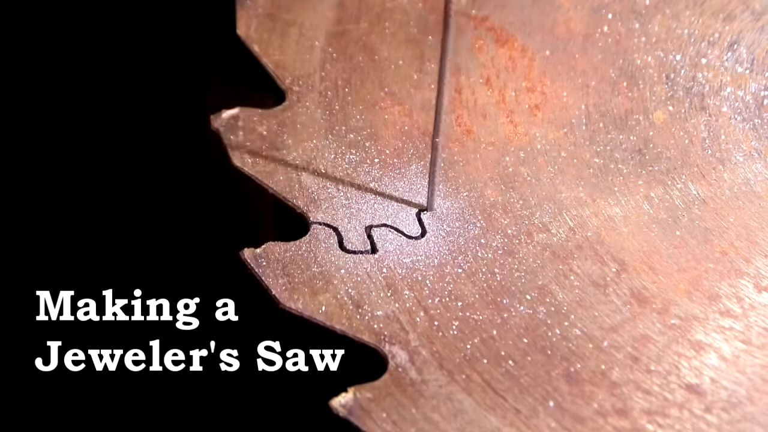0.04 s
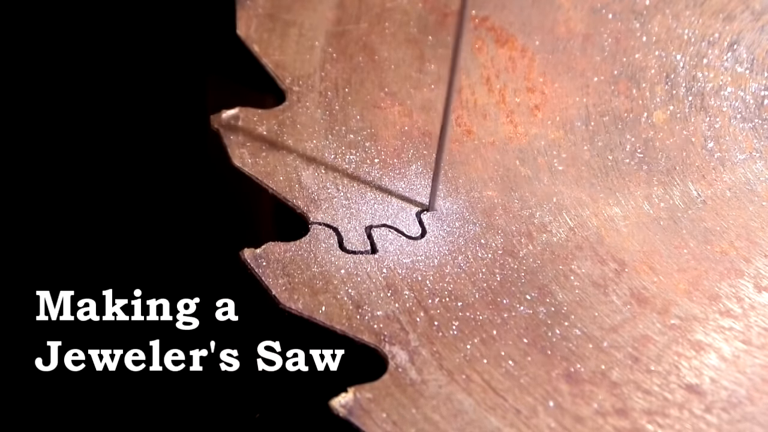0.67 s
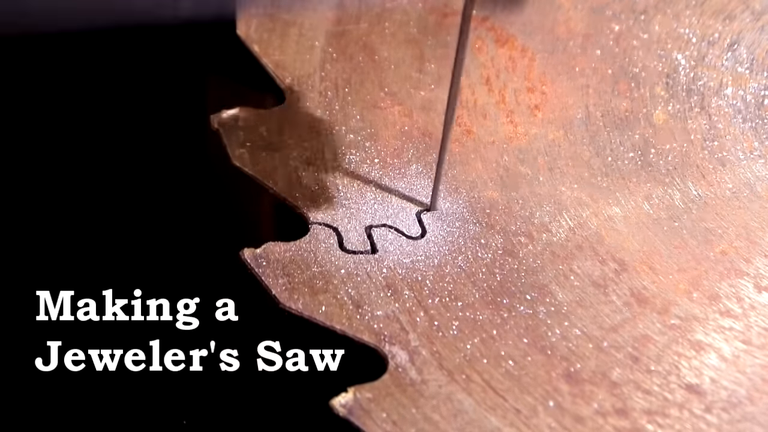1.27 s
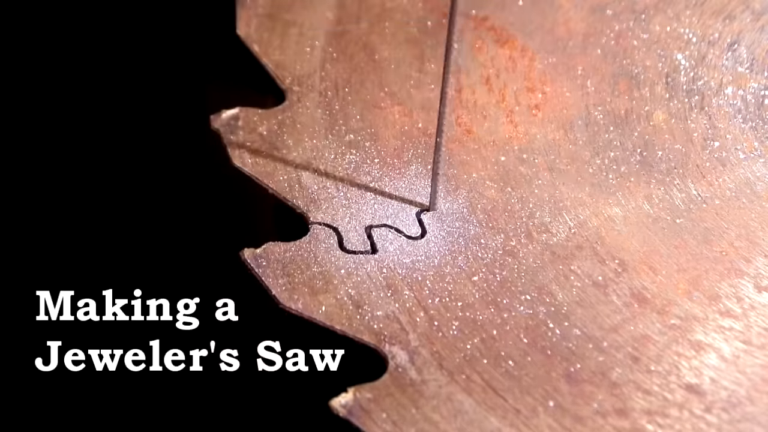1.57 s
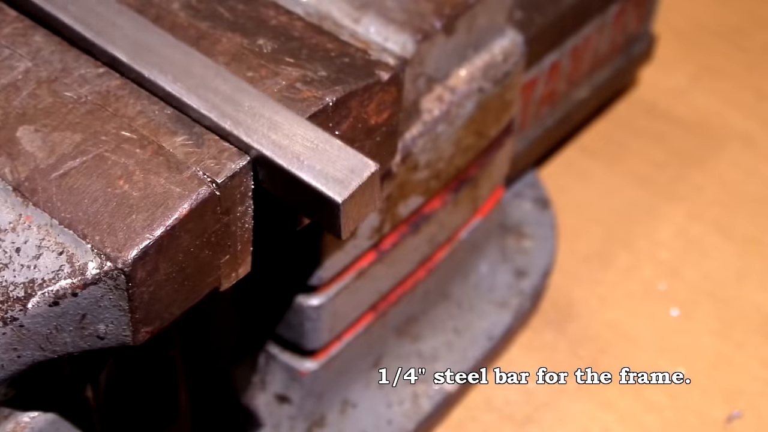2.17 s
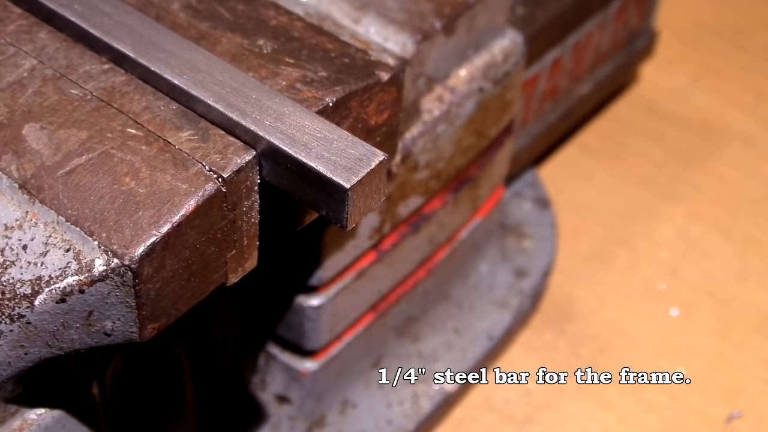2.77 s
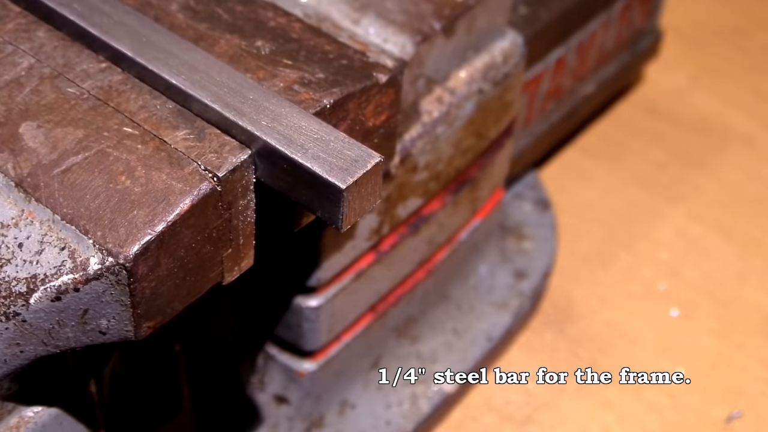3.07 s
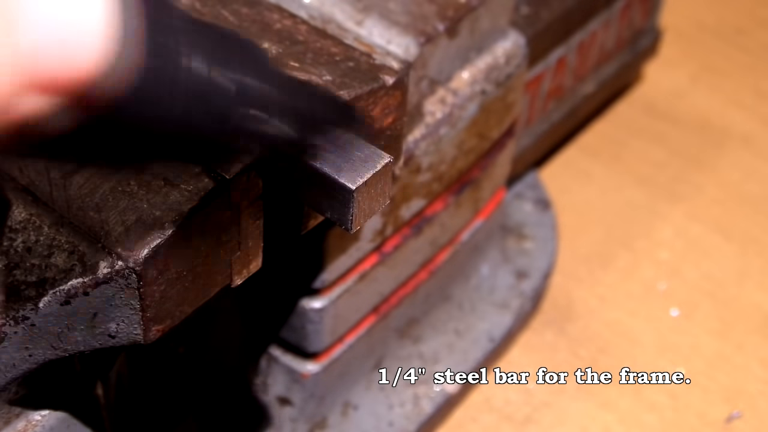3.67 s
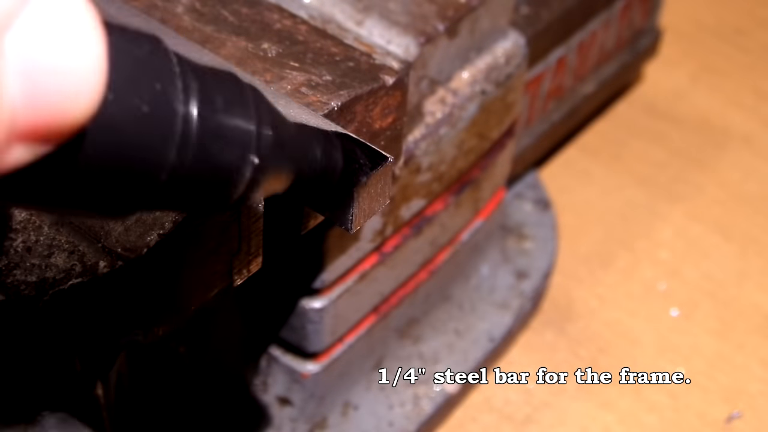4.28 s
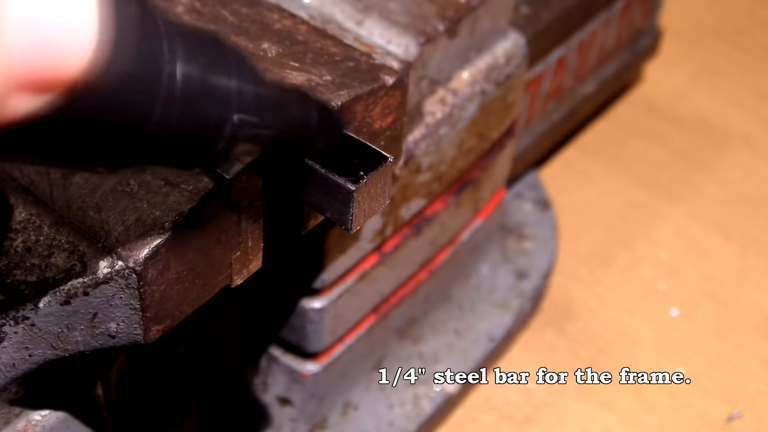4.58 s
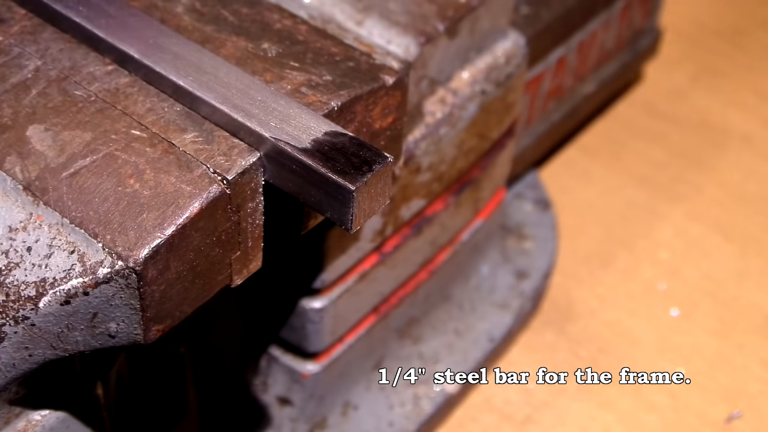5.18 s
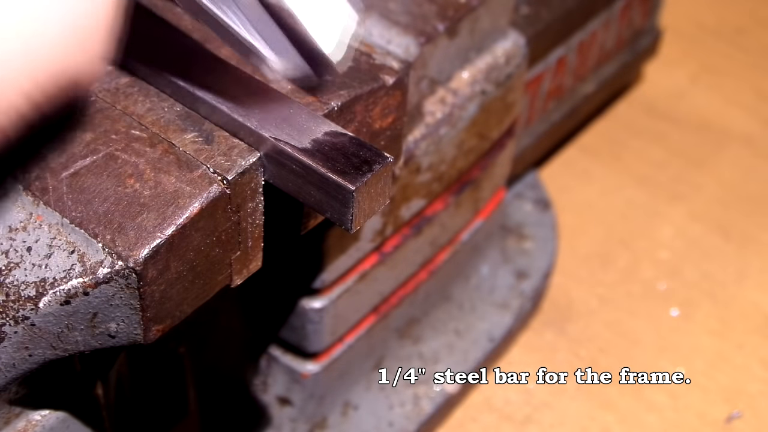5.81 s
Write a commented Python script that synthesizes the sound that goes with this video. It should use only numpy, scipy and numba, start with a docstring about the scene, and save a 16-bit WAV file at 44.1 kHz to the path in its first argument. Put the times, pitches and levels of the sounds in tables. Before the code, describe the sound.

A thin saw blade cuts a steel plate close to the microphone in a small, quiet workshop, rasping and singing with hard down-strokes and lighter returns. It stops abruptly and a steel clink follows. Hands bump softly about, and a marker's plastic cap clicks and rubs off. The felt tip hisses quietly over a steel bar in a few strokes and a quickening scribble, then faint swishes trail away.

```python
"""A thin fret-saw blade cuts a steel plate in a small, quiet workshop. The teeth tear chips on biting
down-strokes and lighter returns: the plate rasps, the bench rumbles, the taut blade sings and judders.
The sawing cuts off abruptly; a steel clink follows. Hands bump about and uncap a felt marker with
plastic clicks and a rub. Felt hisses over a steel bar held in a vice: four strokes, a quickening
scribble, one last stroke. Faint swishes follow as the hand withdraws."""
import sys
import numpy as np
from scipy import signal
from scipy.fft import rfft, irfft, next_fast_len
from scipy.io import wavfile
from scipy.ndimage import uniform_filter1d
from numba import njit

SR = 44100
rng = np.random.default_rng(int(sys.argv[2]) if len(sys.argv) > 2 else 0)


def wrap_up_sound(samples):
    """Save the sound to the file named by the first command line argument, as 16-bit audio."""
    columns = np.atleast_2d(samples).T
    # keep every value between -1 and 1, then stretch to whole-number steps
    tamed = np.clip(columns, -1, 1)
    steps = np.round(tamed * 32767).astype(np.int16)
    wavfile.write(sys.argv[1], SR, steps)


N = 266805
TIME = np.arange(N) / SR
CUTOFF_HZ = 15750
SAW_GATE_S = 1.851   # the sawing cuts off abruptly here

# bright hiss of the felt tip and the hand's swishes: (frequency [Hz], level [dB])
HISS_COLOUR = [(1180, -33), (2000, -10), (2420, -7), (3060, -0.5), (3740, -2), (4010, 1.5), (4770, -2),
               (5210, 1), (7000, 0.5), (10600, -3), (12300, 1.5), (15200, -4.5), (16000, -13)]


def from_db(db):
    """Decibels to gain."""
    return 10 ** (np.asarray(db) / 20)


def rms_one(x):
    """Scale to unit power."""
    return x / np.sqrt(np.mean(x ** 2) + 1e-20)


def evened(x, size=1300):
    """Ride the gain to hold unit power, smoothed over size samples."""
    return x / np.sqrt(np.abs(uniform_filter1d(uniform_filter1d(x * x, size), size)) + 1e-12)


def in_time(rows):
    """Breakpoints to one automation curve per column."""
    times, *columns = np.transpose(rows)
    return [np.interp(TIME, times, column) for column in columns]


def band(x, edges_hz, kind, order=4):
    """Butterworth filter."""
    return signal.sosfilt(signal.butter(order, edges_hz, kind, fs=SR, output="sos"), x)


def body(x, colour, modes=()):
    """Filter of unit power gain: a broad colour with resonances standing on it."""
    size = 2 * next_fast_len(N // 2 + SR // 4)
    hz = np.fft.rfftfreq(size, 1 / SR) + 1e-3
    colour_hz, colour_db = np.transpose(colour)
    power = from_db(np.interp(np.log(hz), np.log(colour_hz), colour_db)) ** 2
    for centre, width, db in modes:
        power = power + from_db(db) ** 2 / (1 + ((hz - centre) / width) ** 2) ** 2
    power /= np.mean(power * (hz < CUTOFF_HZ))
    cepstrum = irfft(np.log(power))[:size // 2]   # minimum phase: nothing sounds early
    cepstrum[0] /= 2
    return irfft(rfft(x, size) * np.exp(rfft(cepstrum, size)))[:N]


def ringing(x, t60, wet_db):
    """Countless close modes, of a plate or a small room, add a short diffuse tail."""
    t = TIME[:SR // 3]
    tail = rng.standard_normal(len(t)) * from_db(-60 * t / t60) * (t > .001)
    return x + from_db(wet_db) * signal.fftconvolve(x, tail / np.linalg.norm(tail))[:N]


@njit
def resonator(force, hz, width_hz):
    """One mode whose pitch can glide."""
    out, state = np.zeros(len(force)), 0j
    for i in range(len(force)):
        state = state * np.exp((-np.pi * width_hz + 2j * np.pi * hz[i]) / SR) + force[i]
        out[i] = state.real
    return out


def wander(rate_hz):
    """Smooth random modulation at unit power."""
    return rms_one(band(rng.standard_normal(N), rate_hz, "low", order=2))


def grit(per_s, spread_db):
    """Dense micro-clicks of uneven size, at unit power."""
    sizes = from_db(spread_db * np.minimum(rng.exponential(1, N), 4))
    return rms_one(rng.standard_normal(N) * sizes * (rng.random(N) < per_s / SR))


def pulses(per_s, jitter):
    """One click per cycle of an unsteady rate."""
    cycles = np.cumsum(per_s * (1 + jitter * wander(150))) / SR
    return np.diff(np.floor(cycles), prepend=0)


def blow(s, db, rise, t60):
    """Envelope that swells to its peak at s and dies away."""
    return from_db(db - 60 * np.maximum(TIME - s, 0) / t60) * np.exp(np.minimum(TIME - s, 0) / rise)


def swell(s, half, db=0):
    """Bell-shaped envelope around s."""
    return from_db(db) * np.exp(-((TIME - s) / half) ** 2)


def room_tone():
    """A steady, dark bed of workshop noise."""
    # (frequency [Hz], level [dB])
    room_colour = [(15, -61), (25, -18), (80, -13.5), (117, -1), (206, -9.5), (277, -8.5), (591, -12.5),
                   (714, -11), (911, -18), (1020, -16.5), (1440, -17), (1650, -18), (3920, -24),
                   (14800, -30.5), (16000, -33)]
    return from_db(-60) * body(rng.standard_normal(N), room_colour)


def rustle():
    """Faint swishes as the hand withdraws."""
    # (time [s], half length [s], level [dB])
    swishes = [(5.09, 0.077, -59), (5.384, 0.039, -65), (5.597, 0.025, -67.5)]
    return sum(swell(*swish) for swish in swishes) * body(rng.standard_normal(N), HISS_COLOUR)


def hands():
    """Each bump gives a low thud in the bench and a dull knock; lighter fumbling fills the gaps."""
    # soft bumps: (time [s], thud [dB], knock [dB])
    bumps = [(1.86, -41.5, -49.5), (1.904, -43.5, -42.5), (1.99, -50, -51.5), (2.174, -52, -48),
             (2.395, -45, -54), (2.459, -58, -51.5), (2.567, -55, -52), (2.684, -44.5, -49.5),
             (2.776, -56, -45.5), (2.875, -44.5, -65), (3.005, -62, -57), (3.111, -52, -61),
             (3.247, -39, -46)]
    # tone of each layer: (frequency [Hz], level [dB])
    thud_colour = [(40, 10), (90, -14), (120, 0), (175, 3), (220, -25), (400, -13), (1000, -55.5)]
    knock_colour = [(100, 10), (280, -5), (600, -0.5), (830, -0.5), (1100, -14), (2200, -14.5), (6000, -42)]
    fumble = from_db(-58 + 3.5 * wander(12)) * (TIME > 1.9) * (TIME < 3.2)
    thud_level = fumble + sum(blow(s, db, rise=.016, t60=.27) for s, db, _ in bumps)
    knock_level = sum(blow(s, db, rise=.002, t60=.14) for s, _, db in bumps)
    thuds = thud_level * evened(body(rng.standard_normal(N), thud_colour))
    knocks = body(knock_level * rng.standard_normal(N), knock_colour)
    return band(thuds + knocks, 89, "high")


def cap():
    """The marker's plastic cap clicks brightly, then rubs off its barrel with a duller rasp."""
    # clicks and slides: (time [s], level [dB], rise [s], t60 [s], low-pass [Hz])
    contacts = [(1.9603, -43.5, .0002, 0.067, 4500), (2.457, -56.5, .001, 0.054, 14000),
                (2.762, -41.5, .0002, 0.13, 14000), (2.7736, -23, 0.00025, 0.0096, 12700),
                (2.775, -54, .001, 0.069, 12000), (3.121, -42.5, 0.0013, 0.097, 4200),
                (3.132, -38.5, 0.002, 0.049, 4940), (3.228, -30.5, 0.0034, 0.091, 6000),
                (3.236, -35, 0.0029, 0.1, 5470)]
    # tone of the plastic: (frequency [Hz], level [dB])
    cap_colour = [(100, -32), (200, -5.5), (1300, -8), (2300, -3.5), (3300, -2), (4750, -6), (5400, -3),
                  (6300, -11), (8200, -3), (10000, -5), (11600, -10), (14000, -9), (16000, -24)]
    # its resonances: (frequency [Hz], width [Hz], level [dB])
    cap_modes = [(2290, 130, 6.5), (2830, 390, 3.5), (4080, 230, 1.5), (5700, 230, 5.5), (7000, 230, -2.5),
                 (8580, 60, 1), (8600, 80, -9)]
    force = 0
    for s, db, rise, t60, top_hz in contacts:
        contact = blow(s, db, rise, t60) * rng.standard_normal(N)
        force = force + band(contact, top_hz, "low", order=1)
    return body(force * from_db(1.8 * wander(600)), cap_colour, cap_modes)


def scribble_speed():
    """Relative speed of the tip as it swings to and fro, unevenly and ever faster."""
    start_s, end_s = 4.197, 4.909
    swings_per_s, quickening_per_s2 = 20, 11
    t = TIME - start_s
    swing = np.sin(np.pi * (swings_per_s * t + quickening_per_s2 * t ** 2 / 2)) ** 2
    turn = from_db(-10)   # some hiss remains at the turning points
    uneven = from_db(1.4 * wander(14))
    return (turn + (1 - turn) * swing) * uneven * (t > 0) * (TIME < end_s)


def marker():
    """Felt fibres slip over the steel bar; hiss and bar tone follow the speed of each stroke."""
    # single strokes: (fastest at [s], rise [s], fall [s], hiss [dB], bar [dB])
    lines = [(3.766, 0.046, 0.0091, -40, -41), (3.904, 0.056, 0.021, -44.5, -46.5),
             (4.007, 0.027, 0.044, -47.5, -53), (4.127, .04, 0.035, -48.5, -51),
             (4.943, 0.038, 0.018, -45.5, -70)]
    # pressure on the felt in the scribble: (time [s], hiss [dB], bar [dB])
    pressure = [(4.2, -47.5, -47), (4.27, -50.5, -66), (4.49, -47.5, -67), (4.63, -48.5, -57.5),
                (4.9, -46.5, -56.5)]
    # the tip lands on the bar: (time [s], level [dB], t60 [s])
    landings = [(4.207, -31, 0.0085), (4.728, -45.5, 0.043)]
    # tone of the clamped bar: (frequency [Hz], level [dB])
    bar_colour = [(30, -40), (80, 2), (150, -6), (500, -4.5), (900, -4.5), (1400, -3.5), (1800, 4.5),
                  (2300, -5.5), (4000, -0.5), (8000, -36)]
    strokes = [(swell(s, np.where(TIME < s, rise, fall)) ** 2, hiss_db, bar_db)
               for s, rise, fall, hiss_db, bar_db in lines]
    strokes.append((scribble_speed(), *in_time(pressure)))
    hiss_level = sum(from_db(db - 1.5) * speed for speed, db, _ in strokes)
    bar_level = sum(from_db(db - 1.6) * speed ** 2 for speed, _, db in strokes)
    taps = sum(blow(s, db, .00033, t60) for s, db, t60 in landings)
    felt = body((hiss_level + taps) * grit(per_s=20000, spread_db=3), HISS_COLOUR)
    bar = body((bar_level + .33 * taps) * grit(per_s=6000, spread_db=-.5), bar_colour)
    return felt + bar


def clink():
    """A short slide of steel on steel ends in a sharp contact."""
    # (time [s], level [dB], t60 [s])
    hits = [(1.883, -23, 0.074)]
    # tone of the steel: (frequency [Hz], level [dB])
    steel_colour = [(100, -21), (600, -11), (1100, -16), (2200, -17), (3000, -11), (7000, -9),
                    (11000, -14.5), (16000, -24)]
    # its resonances: (frequency [Hz], width [Hz], level [dB])
    steel_modes = [(498, 56, 4.5), (2760, 38, -3), (3000, 16, 5), (3710, 83, 3.5), (4120, 110, -0.5),
                   (4597, 50, -2), (6223, 60, -18), (6815, 68, -7), (8800, 130, -4), (10020, 60, -3),
                   (12590, 90, -6)]
    force = 0
    for s, db, t60 in hits:
        slide = blow(s, db - 13, .0045, t60)
        snap = blow(s, db, .0001, .007)
        tail = blow(s, db - 6, .0001, t60)
        force = force + slide + snap + tail
    return body(force * rng.standard_normal(N), steel_colour, steel_modes)


def bench(shake_db):
    """The sawing shakes a low rumble out of the bench."""
    # (frequency [Hz], level [dB])
    bench_colour = [(25, -42.5), (55, -8.5), (85, -25), (108, 3), (127, 12), (148, -9.5), (170, 6),
                    (195, -3), (240, -5.5), (290, 0.5), (380, -2.5), (540, -16), (600, -1.5), (680, -29),
                    (1000, -45.5)]
    return from_db(shake_db) * evened(body(grit(per_s=3000, spread_db=-.5), bench_colour))


def frame(force, shake_db):
    """The teeth ring one mode of the saw frame, just under the bench in level."""
    ring = resonator(force, hz=np.full(N, 582.), width_hz=34)
    return from_db(shake_db - 3) * evened(band(ring, [480, 680], "band", order=2))


def squeals():
    """The blade's flank rubs in the kerf and friction locks on to one high mode for a moment."""
    # (time [s], half length [s], pitch [Hz], level [dB])
    chirps = [(0.543, .026, 1870, -45), (0.956, 0.0056, 4654, -34), (1.168, 0.0071, 6180, -29)]
    return sum(np.sqrt(2) * swell(s, half, db) * np.sin(2 * np.pi * hz * TIME)
               for s, half, hz, db in chirps)


def judder(pitch):
    """Under heavy pressure the teeth snag once per swing of the blade: a snap and a spray of chips."""
    # (time [s], half length [s], level [dB])
    bursts = [(0.706, 0.011, -34.5), (1.199, 0.015, -22.5), (1.738, 0.024, -31.5)]
    # bright snap: (frequency [Hz], level [dB])
    snap_colour = [(400, -7.5), (3000, -2.5), (7000, 1), (9000, -5.5), (12000, -1.5), (16000, -14)]
    snags = pulses(pitch, jitter=.012)
    chips = evened(signal.lfilter([1], [1, -.96], snags) * rng.standard_normal(N))
    pressure = sum(swell(*burst) for burst in bursts)
    force = pressure * (1.2 * evened(snags) + .667 * chips)
    return ringing(body(force, snap_colour), t60=.061, wet_db=-5)


def tooth_tone(rate):
    """The tooth rate itself is heard as a gliding zip, with its octave."""
    phase = 2 * np.pi * np.cumsum(np.abs(rate) * (1 + .01 * wander(120))) / SR
    return (np.sin(phase) + from_db(-12.5) * np.sin(2 * phase)) * from_db(2 * wander(80))


def blade(force, pitch, swing_db):
    """The taut blade is half bowed, half shaken by the teeth: its fundamental and its octave."""
    phase = 2 * np.pi * np.cumsum(pitch * (1 + .016 * wander(78))) / SR
    bowed = np.sin(phase) * from_db(4.5 * wander(47.7))
    shaken = band(resonator(force, pitch, width_hz=9.2), [300, 700], "band", order=2)
    fundamental = evened(bowed + from_db(-3) * evened(shaken, size=900), size=900)
    bowed = np.sin(2 * phase) * from_db(.64 * wander(38.68))
    shaken = band(resonator(force, 2 * pitch, width_hz=27.48), [650, 1200], "band", order=2)
    octave = evened(bowed + from_db(-5.5) * evened(shaken))
    octave_db = -12.5 + .25 * (swing_db + 19)   # a wider swing is brighter
    return from_db(swing_db) * (fundamental + from_db(octave_db) * octave)


def scraping(force, cutting, rasp_db, plate_db):
    """High rasp and midrange plate ring; the blade presses on the kerf differently in each direction."""
    # broad tone of the scrape: (frequency [Hz], level [dB])
    cut_colour = [(100, -24.5), (700, -42), (1050, -14), (2000, -20), (2800, -17.5), (3400, -14),
                  (3800, -21), (5000, -22.5), (7900, -25), (8600, -33), (10500, -31), (12300, -27.5),
                  (14000, -31), (16000, -38.5)]
    return_colour = [(100, -21), (700, -53), (1050, -21), (2000, -22), (2800, -21.5), (3400, -17.5),
                     (3900, -23), (5000, -22.5), (7900, -24.5), (8600, -31.5), (10500, -28), (12300, -24.5),
                     (14000, -29.5), (16000, -35)]
    # resonances of plate and saw frame: (frequency [Hz], width [Hz], level [dB])
    cut_modes = [(818, 71, -9.5), (942, 39, -25.5), (1485.6, 22, -1.5), (1830, 72, -17.5), (2102, 13, -9),
                 (2610, 40, -18), (3070, 68, -6), (3310, 69, -9), (3450, 24.5, -8), (4445, 97, -20.5),
                 (4717, 120, -13), (5145, 88, -15), (6066, 46, -24), (6760, 100, -14), (7160, 32, -32),
                 (8020, 110, -27)]
    return_modes = [(806, 41.4, -3), (1203, 21, -5.5), (1427, 40, -5), (1800, 15, -10.5), (2660, 72, -26),
                    (3000, 46, -16.5), (3220, 39, -5.5), (3700, 42, -13.5), (4630, 230, -13),
                    (4980, 49, -20), (5285, 62, -14), (6064, 45, -18.5), (6700, 130, -14), (7740, 360, -19)]
    scrape = cutting * body(force, cut_colour, cut_modes)
    scrape += (1 - cutting) * body(force, return_colour, return_modes)
    treble = ringing(band(scrape, 2200, "high"), t60=.07, wet_db=-1)
    rasp = from_db(rasp_db + .74 * wander(90)) * evened(treble, size=600)
    plate = from_db(plate_db - 2.5) * evened(band(scrape, [680, 2200], "band"), size=700)
    return rasp + plate


def stroke_place(t, start, fastest, end):
    """0 at the fastest moment of a stroke, 1 at both turning points."""
    return np.interp(t, [start, fastest, end], [1, 0, 1])


def stroke_speed(t, start, fastest, end):
    """Speed of the sawing hand, 0-1, in a rounded arch."""
    return 1 - stroke_place(t, start, fastest, end) ** np.where(t < fastest, 1.55, 1.5)


def stroke_fade(t, start, fastest, end, entry, depth_db, curvature):
    """Level in dB relative to mid-stroke; a hard entry starts almost at full force."""
    return -depth_db * np.where(t < fastest, entry, 1) * stroke_place(t, start, fastest, end) ** curvature


def saw_motion():
    """Automation: tooth rate, blade pitch, and dB levels of rasp, plate, tooth tone, blade and bench."""
    # (start [s], fastest [s], end [s], top rate [teeth/s, negative on returns], soft entry [0-1],
    #  rasp [dB], plate [dB], tooth tone [dB], blade [dB], bench [dB], blade at full speed [Hz],
    #  swing stalls at [s], stall half length [s])
    strokes = [(-.25, -0.089, .055, -1500, 1, -32.5, -29, -44.5, -16.5, -35.5, 425.5, .06, 0.005),
               (.064, .165, .298, 1560, .8, -24, -22.5, -21.5, -17, -26, 422.8, .148, 0.0056),
               (0.301, 0.449, 0.56, -1700, 0.72, -27, -29, -45, -18, -33.5, 420.2, .437, 0.034),
               (0.584, 0.707, 0.87, 1495, 0.19, -25.5, -24, -15, -16, -23.5, 484.3, 0.68, 0.019),
               (.85, .965, 1.121, -1600, 0.71, -30.5, -30.5, -55, -20.5, -29, 406.2, .975, 0.011),
               (1.123, 1.207, 1.381, 1749.5, 0.66, -23.5, -23, -26.5, -14, -25.5, 428.3, 1.268, 0.0099),
               (1.386, 1.51, 1.623, -1600, 0.88, -33, -32.5, -51, -22.5, -34, 410.3, 1.527, 0.011),
               (1.657, 1.746, 1.86, 1801, 0.88, -21.5, -22.5, -27.5, -14.5, -23.5, 425.7, 1.755, 0.0094)]
    # fades towards the turning points, cut then return: (depth [dB], curvature)
    rasp_fade = ((29, 1.6), (29, 1.89))
    plate_fade = ((27.84, 1.6), (24.8, 2.77))
    blade_fade = ((33.5, 1.7), (24.8, 1.69))
    bench_fade = ((9, 2.2), (6, 0.83))
    # slow teeth shake the bench most: (rate [teeth/s], level [dB])
    bench_response = [(0, -11.5), (380, -1), (1000, -2), (1500, -8)]
    blade_lag_s, bench_trend_db_per_s = (.014, .022), (-9, 21)   # cut, return
    taut_hz, plate_mode_hz, lock_width_hz = 473.8, 1506, 95
    even_bite_s, even_fade_s, turn_s = .125, .035, .0019
    controls = np.zeros((7, N))
    for start, fastest, end, top_rate, entry, *levels, hz, stall, stall_half in strokes:
        rasp_db, plate_db, tone_db, blade_db, bench_db = levels
        now = (TIME >= start) & (TIME < SAW_GATE_S + .1)
        t, span = TIME[now], (start, fastest, end)
        way = int(top_rate < 0)   # 0 cut, 1 return
        rate = top_rate * stroke_speed(t, *span)
        late = t - blade_lag_s[way]   # the swing builds and dies later than the force
        if way:   # the pitch sags; after the stall it restarts sharp and slides flat
            restart = stall + .04
            pitch = hz - 90 * (t - fastest) - 750 * (t - restart) * swell(restart, .045)[now]
        else:   # a cut holds the blade taut until it nears full speed
            slack = np.clip(.5 + (stroke_speed(late, *span) - .86) / .1, 0, 1)
            pitch = taut_hz + (hz - taut_hz) * slack
        # the tooth tone peaks while the early, even bite meets the plate's main resonance
        even = np.exp(-np.maximum(t - start - even_bite_s, 0) / even_fade_s)
        lock = even / (1 + ((np.abs(rate) - plate_mode_hz) / lock_width_hz) ** 2)
        stalling = swell(stall, stall_half)[now]
        grab_db = 2.5 * swell(start + .025, .012)[now] * (1 - way)   # teeth grab as a cut begins
        bite_db = stroke_fade(t, *span, entry, *plate_fade[way]) + grab_db
        ease_db = -.5 * lock * (1 - way) - 1.5 * stalling
        shake_db = np.interp(np.abs(rate), *np.transpose(bench_response))
        shake_db += bench_trend_db_per_s[way] * (t - fastest)
        controls[:, now] = (
            rate, pitch,
            rasp_db + stroke_fade(t, *span, entry, *rasp_fade[way]) + grab_db + ease_db,
            plate_db + bite_db - 2.5 * stalling,
            tone_db + bite_db - 16 * (1 - lock) - 8.5 * (1 - even),
            blade_db + stroke_fade(late, *span, entry, *blade_fade[way]) - 11.5 * stalling,
            bench_db + stroke_fade(t, *span, entry, *bench_fade[way]) + shake_db + grab_db)
    return uniform_filter1d(controls, int(turn_s * SR), axis=1)


def saw():
    """Teeth catch one by one and tear chips; that force drives plate, blade and frame."""
    rate, pitch, rasp_db, plate_db, tone_db, swing_db, shake_db = saw_motion()
    bites = pulses(np.abs(rate) + 40, jitter=.015) * from_db(1.15 * rng.standard_normal(N))
    teeth = evened(band(bites, 200, "high", order=2))
    force = from_db(-9) * teeth + grit(per_s=9000, spread_db=3)
    cutting = np.clip(.5 + rate / 300, 0, 1)   # crossfade: 1 on the cut, 0 on the return
    scrape = scraping(force, cutting, rasp_db, plate_db)
    song = from_db(tone_db) * tooth_tone(rate) + blade(force, pitch, swing_db)
    low_end = bench(shake_db) + cutting * frame(force, shake_db)
    gate = np.clip((SAW_GATE_S - TIME) / .0022, 0, 1)
    return (scrape + song + low_end + judder(pitch) + squeals()) * gate


def scene():
    """The close saw, then small handling sounds with a short room tail, over quiet room tone."""
    background = rustle() + room_tone()
    handling = ringing(clink() + cap() + hands() + marker(), t60=.064, wet_db=-3)
    return (background + handling + saw())[None]


def record(dry):
    """A steep low-pass takes off the very top."""
    return signal.sosfilt(signal.ellip(12, .1, 90, CUTOFF_HZ, fs=SR, output="sos"), dry)


dry = scene()
out = record(dry)
wrap_up_sound(out)
```